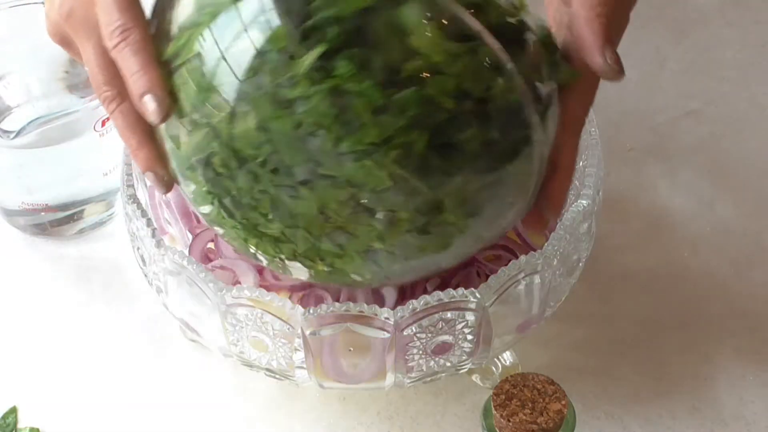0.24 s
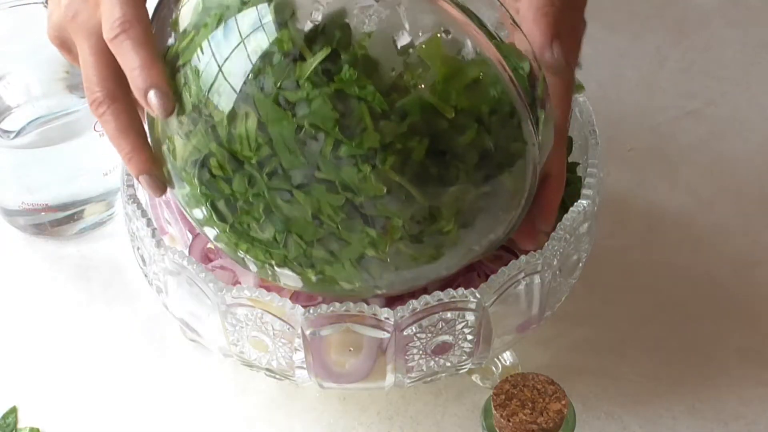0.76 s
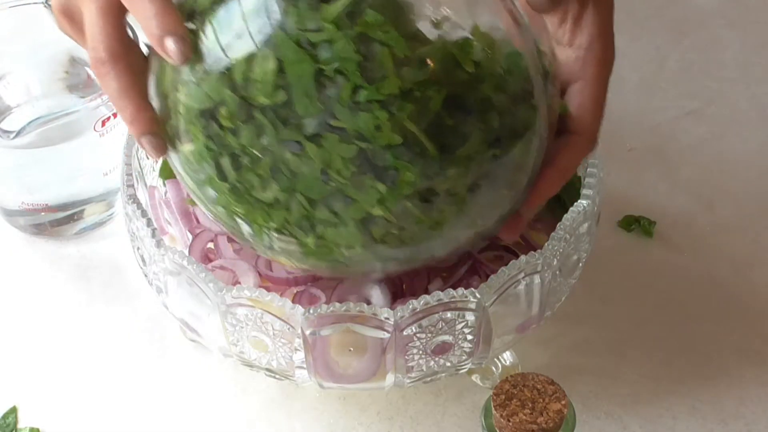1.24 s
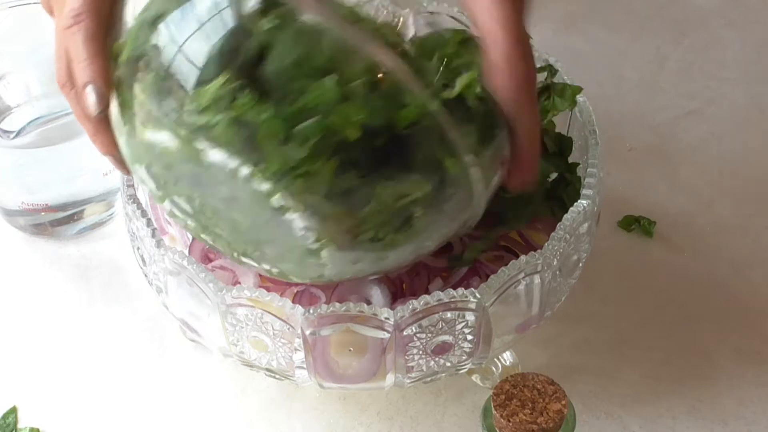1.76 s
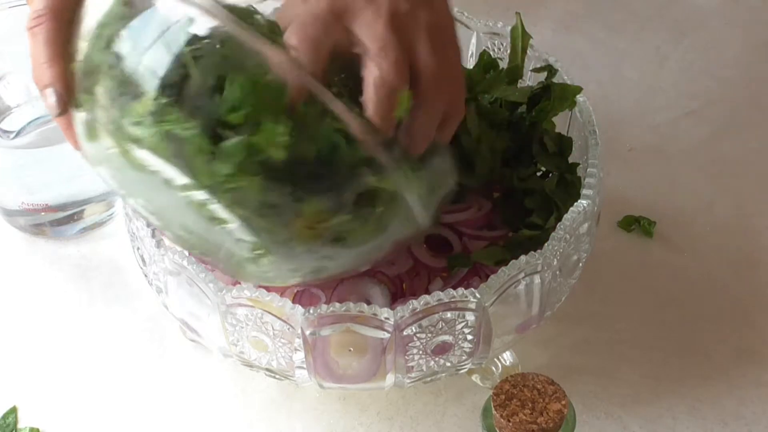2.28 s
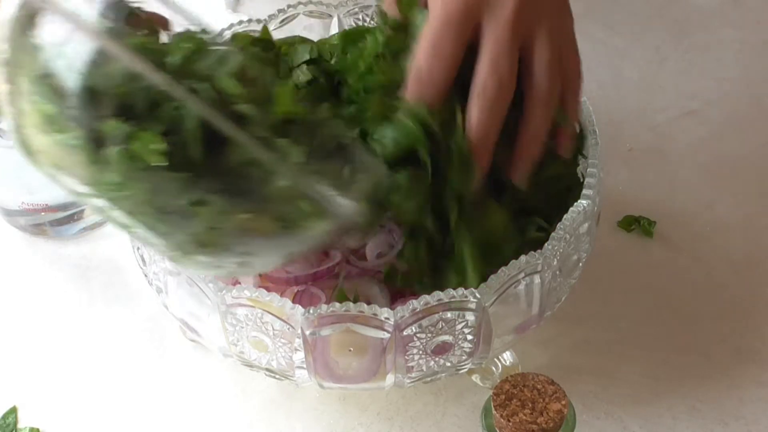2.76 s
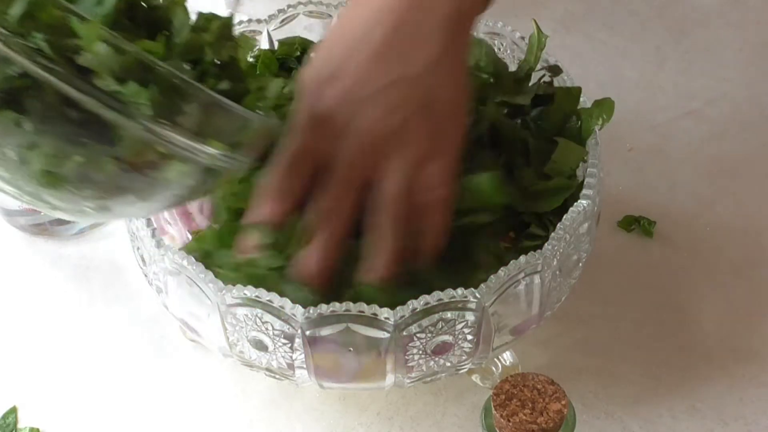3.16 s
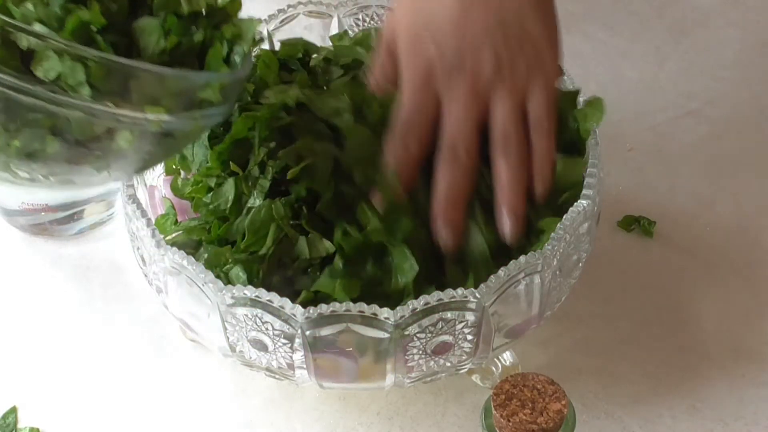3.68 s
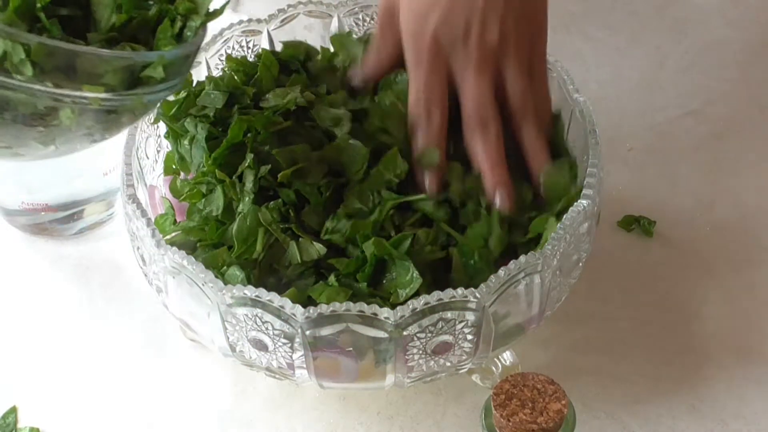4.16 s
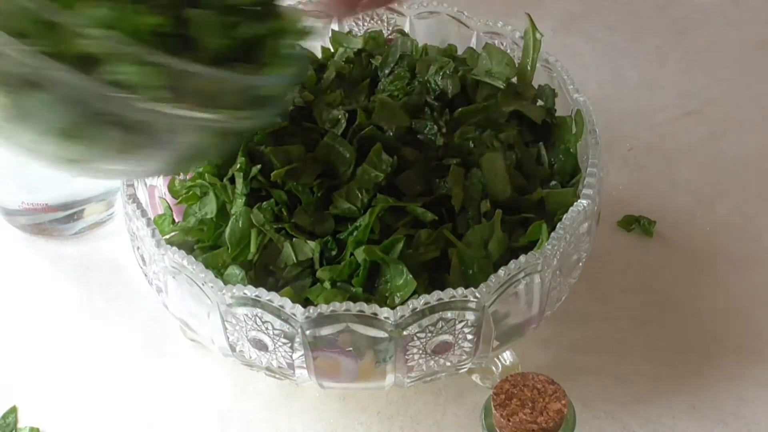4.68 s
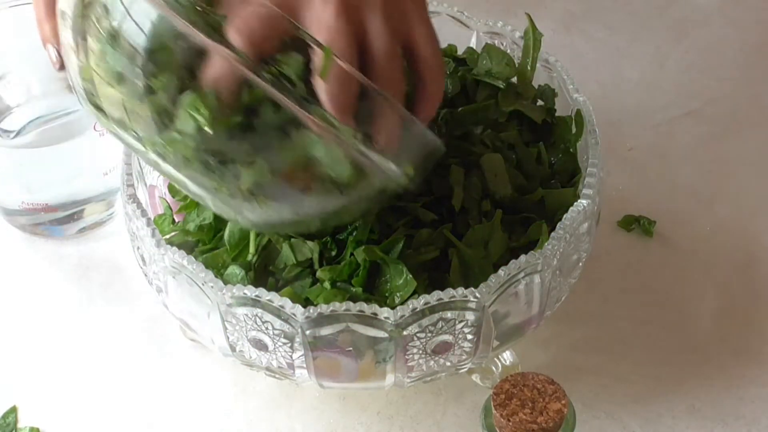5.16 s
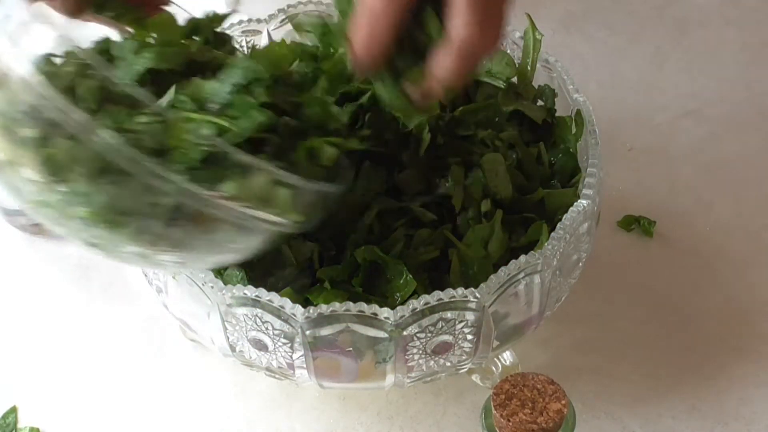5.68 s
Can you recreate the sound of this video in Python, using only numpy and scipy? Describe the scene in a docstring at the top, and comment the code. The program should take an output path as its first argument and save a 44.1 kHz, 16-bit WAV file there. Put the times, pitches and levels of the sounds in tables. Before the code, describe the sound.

Close stereo in a small, hard kitchen with a low noisy hum. A fading slap on a full glass bowl opens it, then a hard clink with rattling and a short burst of rustling leaves. After a quieter pause a second clink chatters out, leaves are raked and pressed in crackling strokes with stem snaps, and a last clear clink ends it.

```python
"""A small hard kitchen, close stereo microphone with gain control: a thin glass bowl is tipped over a heavy
cut-glass bowl. The rims knock, rattle and ring as dying sines with a burst of grating noise, while a hand rakes
and presses chopped leaves, heard as coloured noise with crackling grains and sharp snaps of stems.
A slap on the bowl is dying away at the start; a noisy hum lies underneath, and sparse taps form the room."""
import sys
import numpy as np
from scipy import signal
from scipy.fft import rfft, irfft
from scipy.io import wavfile
from scipy.ndimage import uniform_filter1d

SR = 44100
rng = np.random.default_rng(int(sys.argv[2]) if len(sys.argv) > 2 else 0)


def unload_wav(signal):
    """Save mono or channel-first audio to the path in sys.argv[1] as 16-bit WAV at rate SR, clipped to [-1, 1]."""
    wavfile.write(
        sys.argv[1],
        SR,
        np.round(np.clip(np.atleast_2d(signal).T, -1, 1) * 32767).astype(np.int16),
    )


N = 261072

# likeness of the two channels for the wide sounds: pitch_hz, likeness (0-1)
SAME = [(60, 0.95), (180, 0.36), (550, 0.55), (1650, 0.22), (4970, 0.24), (15000, 0.082)]
# likeness of the two channels for leaves and slap: pitch_hz, likeness (0-1)
NEAR = [(60, 1), (180, 0.46), (550, 0.68), (1650, 0.83), (4970, 0.72), (15000, 0.46)]
# colour of the leaves' hiss: pitch_hz, relative_level_db (per Hz)
RUSTLE = [(1180, -75), (2000, -6.5), (2640, -8.5), (2850, -9.5), (3510, -6), (3890, -5.5), (4550, -2),
          (6100, -15), (8050, -5), (10800, -2.5), (14000, -14.5), (15800, -24)]


def gain_of(db):
    """Decibels to amplitude."""
    return 10 ** (np.asarray(db) / 20)


def evened(x):
    """Scales to rms 1."""
    return x / np.sqrt(np.mean(x ** 2) + 1e-20)


def read(points, hz):
    """Reads a table on a log-frequency axis."""
    f, value = np.transpose(points)
    return np.interp(np.log(hz + 1), np.log(f + 1), value)


def panned(db):
    """Left and right gains for a left-right difference in dB."""
    return gain_of([[db / 2], [-db / 2]])


def slow_noise(width):
    """Noise smoothed twice over this many samples, rms 1."""
    once = uniform_filter1d(rng.standard_normal(N), size=width)
    return evened(uniform_filter1d(once, size=width))


def add(mix, s, sound):
    """Mixes a stereo sound in at time s."""
    part = mix[:, round(s * SR):][:, :sound.shape[1]]
    part += sound[:, :part.shape[1]]


def colour(x, spectrum, likeness):
    """Filters a pair of noises by a spectrum, blends them to the channels' likeness and balance, rms 1."""
    # balance of the channels: pitch_hz, left_right_db
    tilts = [(60, 0.5), (240, 0), (950, 0.5), (3770, -0.5), (15000, -2.5)]
    hz = np.fft.rfftfreq(N, 1 / SR)
    a, b = rfft(x) * gain_of(read(spectrum, hz))
    same = np.clip(read(likeness, hz), 0, 1)
    tilt = gain_of(read(tilts, hz) / 2)
    right = same * a + np.sqrt(1 - same ** 2) * b
    return evened(irfft([a * tilt, right / tilt], N))


def stop(t, after, left):
    """Falls by 1, from 1 + left to left, within a few milliseconds."""
    return left + 1 / (1 + np.exp(np.clip((t - after) / 0.0012, -50, 50)))


def ring(modes, t, longer=0.92):
    """Dying sines, each t60 scaled by longer; higher modes reach the channels further out of step."""
    hz, db, t60 = np.transpose(modes)[:, :, None]
    lean = 0.55 * np.tanh(hz / 2600.0) * rng.choice([-1, 1], (len(modes), 1))  # radians
    fade = gain_of(db - 60 * t / (t60 * np.clip(longer, .2, 9)))
    turn = 2 * np.pi * hz * t
    return np.array([(fade * np.sin(turn + side * lean)).sum(0) for side in (1, -1)])


def hum():
    """Room air and appliances: coloured noise wavering a little in level."""
    # colour: pitch_hz, relative_level_db (per Hz)
    hum_colour = [(12, -44), (20, -12), (81, -8), (177, 3), (261, -4), (432, -1), (497, -4.5), (657, 0),
                  (1480, -13), (1800, -21.5), (2730, -25.5), (4510, -23), (6140, -30.5), (9860, -23),
                  (15900, -31.5)]
    level_db = -47.2 + 0.64 * slow_noise(3000)
    return gain_of(level_db) * colour(rng.standard_normal((2, N)), hum_colour, SAME)


def slap():
    """The end of a hand slap on the full bowl, noise fluttering in level, then the leaves slumping."""
    # colour of the slap: pitch_hz, relative_level_db (per Hz)
    slap_colour = [(47, -56), (80, -41), (214, -1), (493, 2.5), (747, -6), (870, 5), (1350, -8.5),
                   (1470, 4.5), (1570, -17), (2550, -23), (4310, -20), (5980, -38), (7950, -20.5),
                   (11500, -32), (15000, -50)]
    # colour of leaves sliding down after it: pitch_hz, relative_level_db (per Hz)
    slump_colour = [(47, -58), (80, -50), (180, -6), (423, -0.5), (627, -1.5), (669, -15), (780, -11),
                    (1750, -9), (2380, -25.5), (4310, -21), (5850, -33.5), (10300, -31), (15000, -53)]
    t = np.arange(N) / SR
    rattle = gain_of(1.5 * evened(uniform_filter1d(rng.standard_normal(N), size=120)))
    quick = gain_of(-23.5 - 60 * t / 0.16) * stop(t, 0.074, 0.24) * evened(rattle)
    slow = gain_of(-31.0 - 60 * t / 0.89)
    slapped = quick * colour(rng.standard_normal((2, N)), slap_colour, NEAR)
    return slapped + slow * colour(rng.standard_normal((2, N)), slump_colour, SAME)


def pressing(t):
    """Amplitudes of hiss and lower rustle: lopsided arches, one a stroke, over the leaves' own settling."""
    # leaves settling by themselves: time_s, hiss_db (before the hiss gain)
    resting = [(0, -62), (.3, -66), (5.55, -66.5), (5.72, -62)]
    # hand strokes: start_s, length_s, hiss_db (before the hiss gain), peak_place (0-1),
    # body_db (lower rustle against hiss_db)
    strokes = [(0.363, 0.19, -55.5, 0.4, 1), (0.569, 0.14, -48.5, 0.08, 5.5),
               (0.709, 0.081, -54.5, .15, -2), (.93, 0.16, -61, 0.75, 7.5), (1.14, 0.086, -63, 0.3, 11),
               (1.298, .23, -61.5, 0.42, 12.5), (1.555, 0.2, -66, 0.6, 12), (1.902, 0.22, -61.5, 0.38, 7.5),
               (2.08, 0.4, -52.5, .65, 6), (2.523, 0.42, -52, .75, 3), (2.854, 0.52, -49.5, .5, 1.5),
               (3.306, 0.21, -57, 0.1, 2.5), (3.625, 0.29, -46.5, 0.43, 0.5),
               (3.904, 0.14, -54.5, 0.27, 2.5), (4.124, 0.27, -45.5, 0.59, 2),
               (4.363, 0.19, -56.5, 0.1, -4), (4.755, 0.13, -60, 0, 1), (4.915, 0.16, -59, 0.6, 3.5),
               (5.041, 0.18, -51, 0.73, 5.5), (5.191, 0.2, -47.5, 0.42, 1), (5.295, .3, -48.5, 0.28, 4),
               (5.844, .12, -64, .5, 10)]
    resting_body_db = 5  # lower rustle against hiss_db
    settling = gain_of(np.interp(t, *np.transpose(resting)))
    power = (settling * gain_of([[0], [resting_body_db]])) ** 2
    for start, length, db, top, body_db in strokes:
        peak = start + np.clip(top, .03, .97) * length
        climb = np.interp(t, [start, peak, start + length], [0, 1, 0])
        arch = np.sin(np.pi / 2 * climb) ** 0.9
        power += (gain_of([[db], [db + body_db]]) * arch) ** 2
    return np.sqrt(power)


def leaves():
    """Dense hiss of wet leaves with a crackle of uneven grains, over a smoother lower rustle."""
    # colour of the lower rustle: pitch_hz, relative_level_db (per Hz)
    rustle_low = [(150, -26), (300, -7), (700, 2.5), (1200, -2.5), (1800, -13.5), (2500, -38)]
    hiss_gain_db, wander_db = 3.5, 2  # wander: rms swing of the lower rustle
    hiss, body = pressing(np.arange(N) / SR)
    sizes = gain_of(3.4 * np.minimum(rng.exponential(1, N), 6))
    grains = sizes * (rng.random(N) < 350 / SR)  # about 350 a second
    clumps = evened(signal.oaconvolve(grains, np.exp(-np.arange(400) / 40))[:N])  # about a millisecond each
    drive = rng.standard_normal((2, 2, N))
    high = colour(drive[0] * (1.17 + 0.42 * clumps), RUSTLE, NEAR)
    low = colour(drive[1] * (1.1 + .2 * clumps), rustle_low, NEAR)
    return high * hiss * gain_of(hiss_gain_db) + low * body * gain_of(wander_db * slow_noise(2000))


def thin_bowl(t, sharp, rim_hz, hard_db, lowest_db, twin_db, lip, grip):
    """Free ring of the thin bowl: its modes, their twins and the lowest mode, shortened or drawn out by the grip."""
    # pitches of the modes: pitch_hz
    thin_hz = [1556, 2696, 3959, 5385, 6478, 6952, 8689, 9750, 10450, 10750]
    # for each of those modes: relative_level_db, t60_s (before the grip's factor)
    thin = [(0.5, 0.88), (-3.5, 0.68), (-7.5, 0.5), (-14, 0.28), (-13.5, 0.12), (-17.5, 0.31), (-9, 0.19),
            (-25, 0.25), (-26, 0.22), (-18, .25)]
    # how much a blow on the lip favours each of those modes: share (0-1)
    lip_shares = [0, 1, 0, .6, .3, .6, 1, 1, 1, 1]
    # pitches of the twin modes: pitch_hz (the first before rim pressure lifts it)
    twin_hz = [1616, 1372, 1943, 2722, 4104]
    # for each twin: relative_level_db, t60_s (before the grip's factor)
    twins = [(5, 0.4), (-15.5, 0.99), (-15.5, 0.46), (-6, 0.26), (-15, 0.33)]
    dull_db = (1 - sharp) * -4.5  # per octave: a soft touch loses treble
    lip_db = 20 * np.log10(max(lip, .1))
    modes = [(634, lowest_db, .9)]
    for hz, (db, t60), share in zip(thin_hz, thin, lip_shares):
        octaves = np.log2(hz / thin_hz[0])
        modes.append((hz, db + (hard_db + dull_db) * octaves + share * lip_db, t60))
    stiffer = [(rim_hz / 690) ** .16, 1, 1, 1, 1]  # pressure on the rims shifts the first twin
    for hz, k, (db, t60) in zip(twin_hz, stiffer, twins):
        octaves = np.log2(hz / thin_hz[0])
        modes.append((hz * k, twin_db + db + dull_db * octaves, t60))
    return ring(modes, t, grip) * (1 - np.exp(-t / 0.0044))


def held_tones(t, sharp, heavy_db, rim_db, rim_hz, foot_db):
    """Tones of the touching rims, the bowl foot and the heavy bowl; pitch follows how hard the rims press."""
    # heavy bowl modes: pitch_hz, relative_level_db, t60_s (before the ring's factor)
    heavy = [(567, -14, 0.18), (873, -11, 0.31), (965, 3.5, 0.062), (1068, -10, 0.12), (1156, -15.5, 0.043),
             (1320, -9, 0.039), (1418, -10.5, 0.05), (1840, -4, 0.011)]
    rim_t60 = 0.21 + sharp * (0.054 - 0.21)  # soft to sharp, before the ring's factor
    foot_t60 = .13 + sharp * (0.052 - .13)
    rims = ring([(rim_hz, rim_db, rim_t60)], t)
    foot = ring([(325, foot_db, foot_t60)], t)
    return rims + foot + gain_of(heavy_db) * ring(heavy, t)


def grating(t, crack_db):
    """Glass grating on glass: a coloured noise burst, dying 60 dB in 31 ms."""
    # colour: pitch_hz, relative_level_db (per Hz)
    crack_colour = [(300, -36), (1500, 7), (4000, 0.5), (6000, -10.5), (9000, -3.5), (15000, -15)]
    spectrum = gain_of(read(crack_colour, np.fft.rfftfreq(len(t), 1 / SR)))
    grit = irfft(rfft(rng.standard_normal(len(t))) * spectrum, len(t))
    return gain_of(crack_db - 60 * t / 0.031) * evened(grit)


def table_thump(t, lip, table_db, heavy_db):
    """Table modes, and the heavy bowl rocking on its base, most for a blow on the lip."""
    # table modes: pitch_hz, relative_level_db, t60_s (before the ring's factor)
    table = [(175, -26, 0.066), (201.6, -3, 0.15), (238.4, 5, 0.14)]
    low = ring(table, t) + min(lip, 2) * ring([(126, -9., .6)], t)
    return low * gain_of(table_db + 0.6 * heavy_db)  # follows the heavy bowl by a share of its dB


def knock(s, crack_db, thin_db, heavy_db, rim_db, rim_hz, foot_db, settle):
    """The hand damps the thin bowl's ring; tones held by the touching rims drop when the bowls settle."""
    # how the hands hold the thin bowl: from_s, hardness_db (per octave), lowest_mode_db (relative),
    # twin_modes_db (relative), lip_factor, ring_factor, hand_damps_at_s,
    # table_db (before the heavy bowl's share), left_right_db
    grips = [(.4, -1.5, -7, -9, 0.44, 0.85, 0.52, -16.5, -1), (.6, -10, -3, 1, 0.69, 0.56, 0.72, -17, 1),
             (.8, -7, 1.5, -17, .9, 0.71, 0.86, -20, 3.5), (1.1, -2, -4, -10, 5.5, 0.55, 1.19, -26, 0),
             (2.3, 2, -2, 3, 1.6, 0.48, 2.76, -18, -1), (2.6, -5, 11.5, -4, .75, 0.45, 3.4, -15.5, 0),
             (5.6, -3.5, 2.5, -26, 0.72, 1.11, 5.4, -18, -1)]
    row = [row for row in grips if row[0] < s][-1]
    _, hard_db, lowest_db, twin_db, lip, grip, hold, table_db, pan_db = row
    soft_db, sharp_db = -58, -41  # between these crack levels a soft touch becomes a sharp blow
    sharp = np.clip((crack_db - soft_db) / (sharp_db - soft_db), 0, 1)
    rise = 0.0036 + sharp * (.0008 - 0.0036)  # seconds, soft to sharp
    t = np.arange(SR // 2) / SR
    held = held_tones(t, sharp, heavy_db, rim_db, rim_hz, foot_db)
    free = gain_of(thin_db) * thin_bowl(t, sharp, rim_hz, hard_db, lowest_db, twin_db, lip, grip)
    still = 1 if hold < s else stop(t, hold - s, 0.38)
    sound = held * stop(t, settle, 0.14) + free * still
    sound = sound + table_thump(t, lip, table_db, heavy_db) + grating(t, crack_db)
    onset = (1 - np.exp(-t / max(rise, 1e-4))) * (1 - t / t[-1])
    return onset * sound * panned(pan_db)


def bowls():
    """Every knock and rattle of the two bowls, mixed in at its time."""
    # knocks, levels before onset, modes and damping: start_s, crack_db, thin_bowl_db, heavy_bowl_db,
    # pressed_rims_db, rim_pitch_hz, bowl_foot_db, rims_settle_after_s
    knocks = [(.474, -25, -26, -10.5, -5.5, 713, -11, 0.031),
              (.488, -60, -25.5, -16, -12, 784, -7.5, 0.022), (.554, -60, -40, -28, -28, 817, -18, .018),
              (.633, -60, -47, -30, -19.5, 746.5, -14.5, 0.032),
              (.819, -56, -45.5, -40.5, -47, 710, -53, .08), (.980, -42, -54, -50, -59, 684, -42, .046),
              (1.130, -57, -63, -70, -62, 686, -55, .05),
              (2.355, -18, -31.5, -10.5, -3.5, 714, -9.5, 0.032),
              (2.385, -57, -36.5, -41, -11, 687.6, -45, 0.049),
              (2.425, -60, -38, -34, -13.5, 701.7, -45, 0.041),
              (2.465, -60, -41.5, -45, -23, 741, -41, .045),
              (2.494, -67, -38, -24, -19.5, 677.7, -25.5, 0.056),
              (2.541, -54.5, -46.5, -30, -34.5, 707, -28, 0.059),
              (2.687, -66, -54.5, -54, -36, 709, -46, .059), (2.731, -51, -65, -54, -37, 683, -44, .04),
              (3.321, -37, -74, -55.5, -61, 730, -45, .04),
              (4.984, -44.5, -77, -64, -36.5, 737, -54, 0.037), (5.699, -19.5, -24, -11, 2, 707, -8, 0.02),
              (5.753, -59, -58, -26, -35, 806, -43, .096)]
    out = np.zeros((2, N))
    for row in knocks:
        add(out, row[0], knock(*row))
    return out


def snaps():
    """Single stems snapping: noise bursts of a few milliseconds, brighter than the leaves' hiss."""
    # snaps: start_s, peak_db (before left-right balance)
    stems = [(0.73, -42), (1.0286, -44), (1.8397, -41), (2.685, -35), (2.8005, -27.5), (3.363, -33),
             (3.703, -30), (3.8417, -32), (3.8784, -36.5), (4.168, -31), (4.239, -40), (4.268, -30),
             (4.275, -29), (4.297, -32), (4.3295, -25), (4.769, -35.5), (5.1478, -38), (5.2705, -21),
             (5.2787, -29), (5.425, -30)]
    pan_db, bright_db = -3, 6.5  # left-right; per octave above the hiss colour
    out = np.zeros((2, N))
    hz, t = np.fft.rfftfreq(1024, 1 / SR), np.arange(1024) / SR
    spectrum = gain_of(read(RUSTLE, hz) + bright_db * np.log2(hz / 8000 + .01))
    fade = gain_of(-60 * t / 0.01)
    for s, db in stems:
        burst = fade * irfft(rfft(rng.standard_normal(len(t))) * spectrum, len(t))
        add(out, s, gain_of(db) * panned(pan_db) * burst / abs(burst).max())
    return out


def kitchen(x):
    """Room reflections: sparse taps of random sign, each band dying at its own speed."""
    # decay of the room: pitch_hz, t60_s
    room = [(150, 0.58), (600, 0.51), (2000, 0.46), (8000, 0.18)]
    taps = np.zeros((2, SR))
    at = np.arange(200, SR - 20, 20) + rng.integers(0, 20, (2, (SR - 201) // 20))
    np.put_along_axis(taps, at, rng.choice([-1., 1.], at.shape), 1)
    hz, t, z = signal.stft(taps, SR, nperseg=256)
    decay = gain_of(-60 * t / read(room, hz)[:, None])
    tail = signal.istft(z * decay, SR, nperseg=256)[1]
    tail[1] = 0.79 * tail[0] + .5 * tail[1]  # the channels share much of the tail
    return signal.fftconvolve(x, tail / np.linalg.norm(tail[0]), axes=1)[:, :N]


def scene():
    """Bowls and snaps in the room, over leaves, slap and hum."""
    near = bowls() + snaps()
    no_bass = signal.butter(3, 100., "high", fs=SR, output="sos")  # bowls and snaps lose their deep bass below about 100 Hz
    near = signal.sosfilt(no_bass, near)
    return near + gain_of(-13.0) * kitchen(near) + leaves() + slap() + hum()


def record(dry):
    """Gain control briefly ducks everything when the level passes a threshold; then the band limit."""
    threshold_db, recovery_db_per_s, edge_hz = -14.5, 110.0, 15800
    power_db = 10 * np.log10(abs(uniform_filter1d((dry ** 2).mean(0), size=300)) + 1e-12)
    fall = np.arange(N) * recovery_db_per_s / SR
    held_db = np.maximum.accumulate(power_db + fall) - fall  # peaks fall back at the recovery rate
    over_db = np.maximum(held_db - threshold_db, 0)
    late_db = signal.lfilter([.002], [1, .002 - 1], over_db)  # the control reacts with a lag
    ducked = np.clip(dry / gain_of(0.35 * late_db), -1, 1)
    band = signal.firwin(1023, edge_hz, window=("kaiser", 9), fs=SR)
    return signal.oaconvolve(ducked, band[None], "same")


dry = scene()
out = record(dry)
unload_wav(out)
```